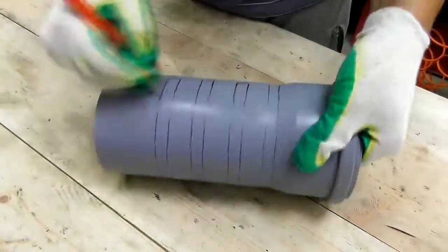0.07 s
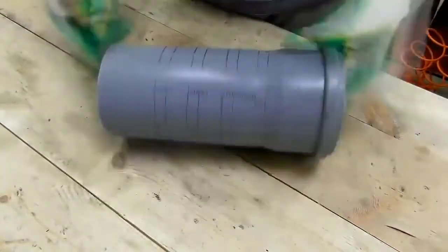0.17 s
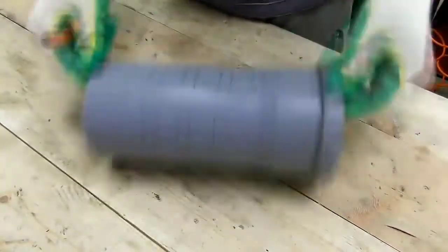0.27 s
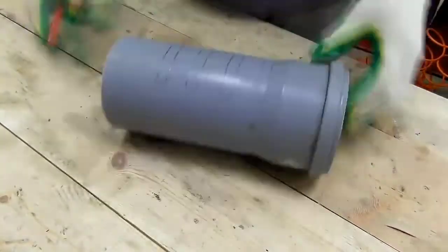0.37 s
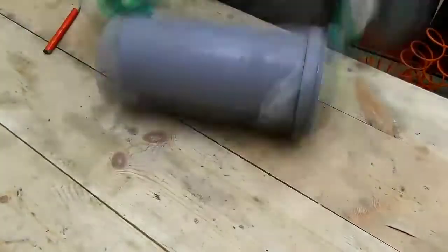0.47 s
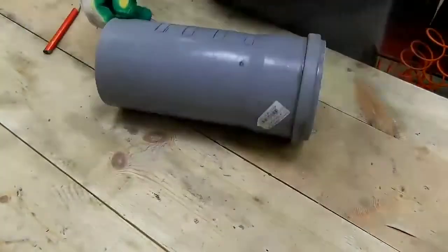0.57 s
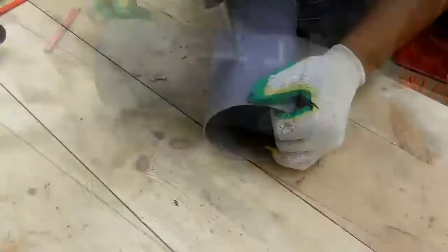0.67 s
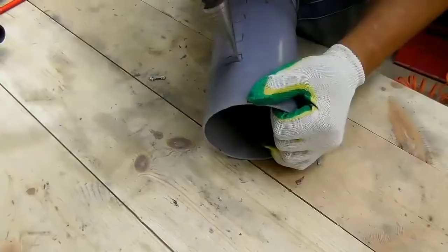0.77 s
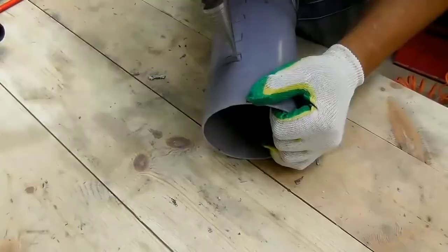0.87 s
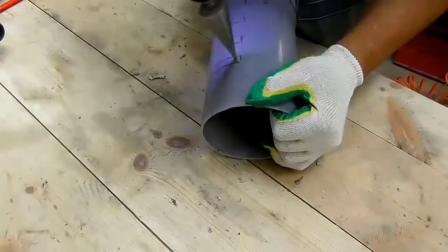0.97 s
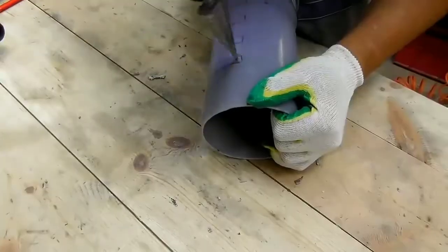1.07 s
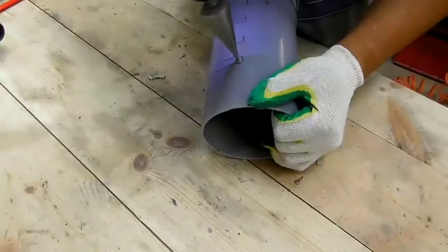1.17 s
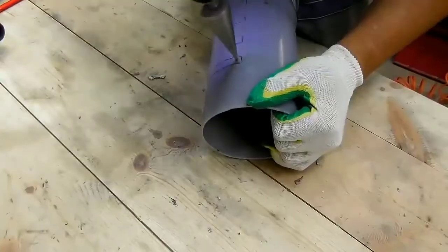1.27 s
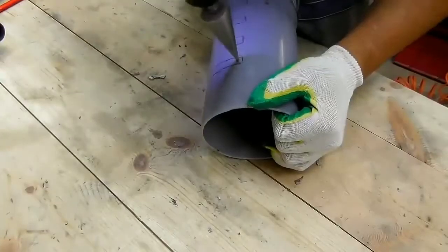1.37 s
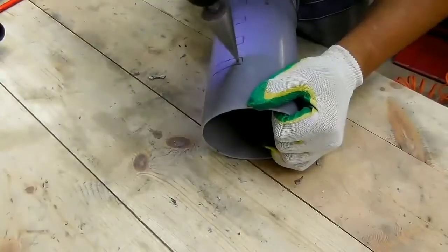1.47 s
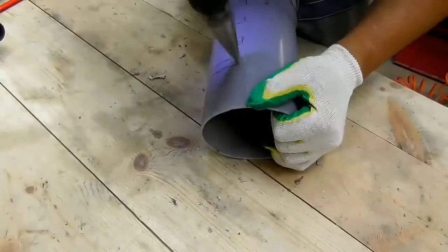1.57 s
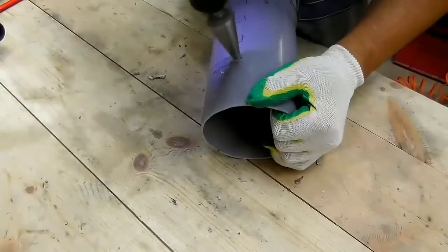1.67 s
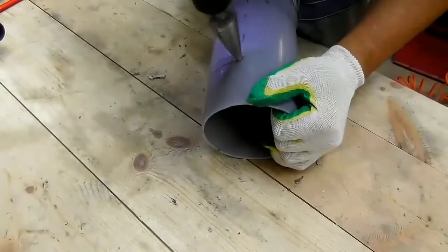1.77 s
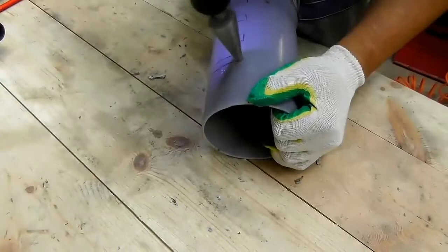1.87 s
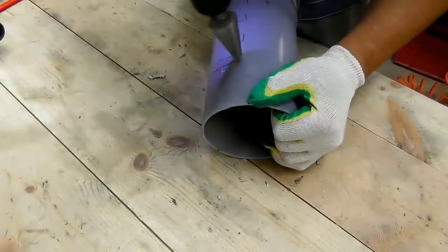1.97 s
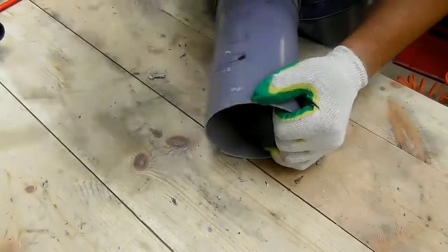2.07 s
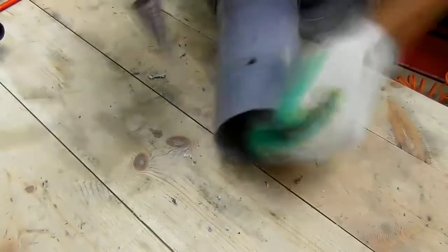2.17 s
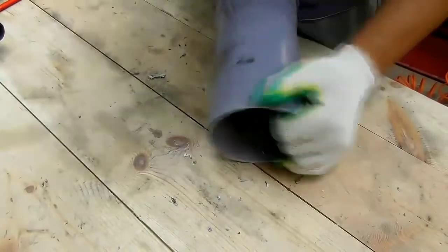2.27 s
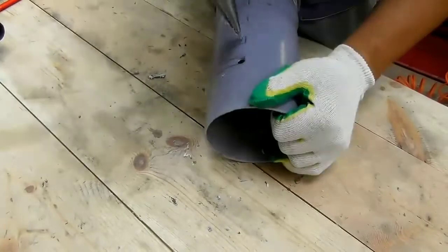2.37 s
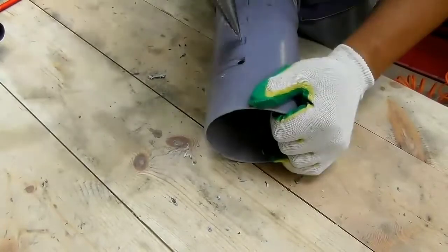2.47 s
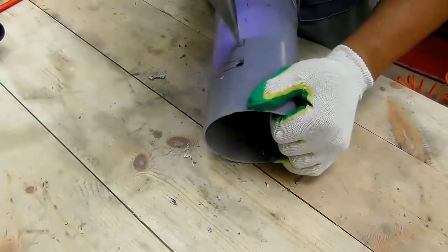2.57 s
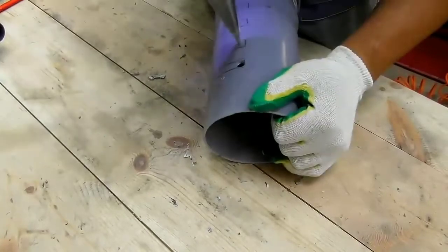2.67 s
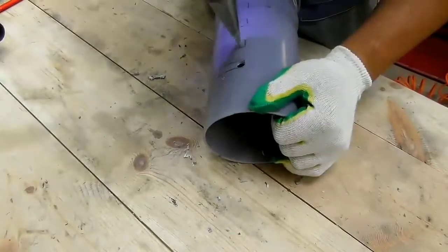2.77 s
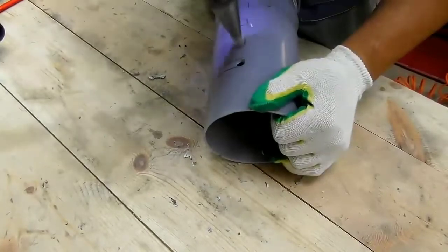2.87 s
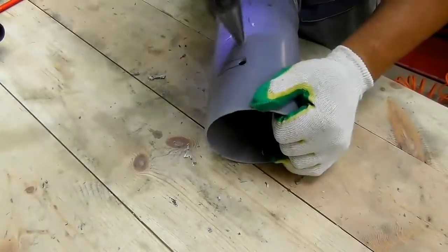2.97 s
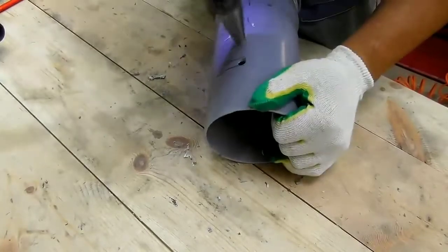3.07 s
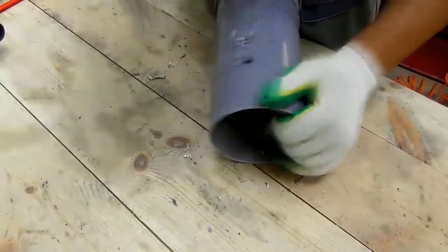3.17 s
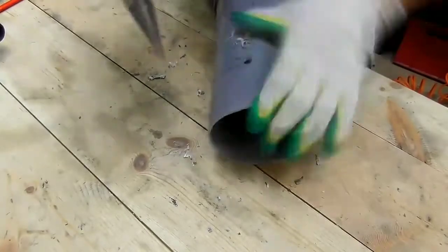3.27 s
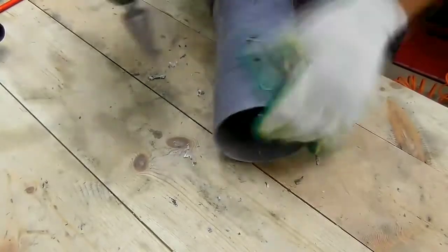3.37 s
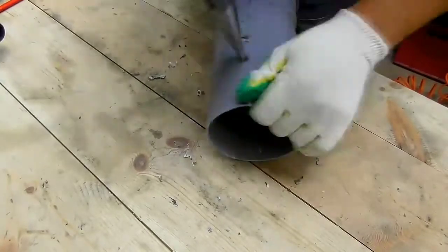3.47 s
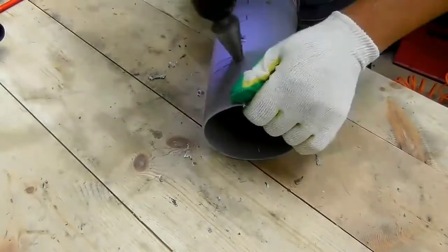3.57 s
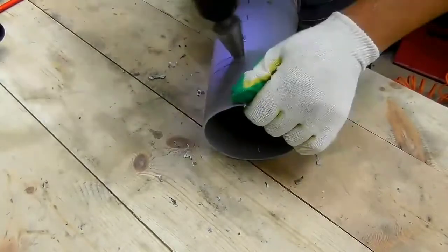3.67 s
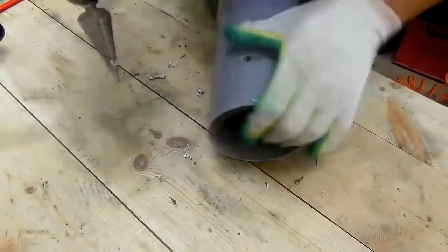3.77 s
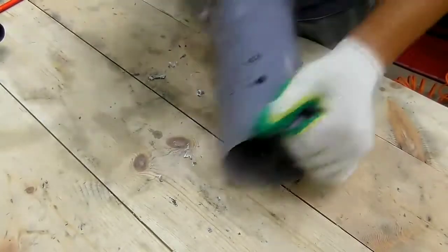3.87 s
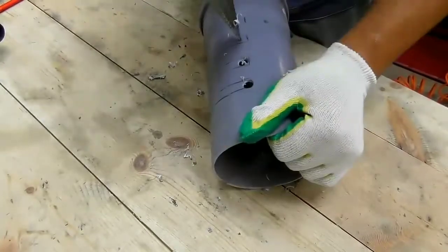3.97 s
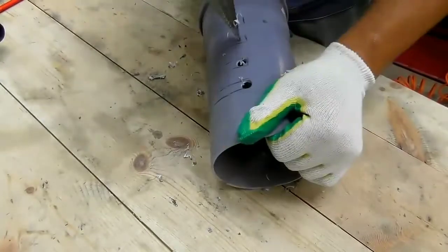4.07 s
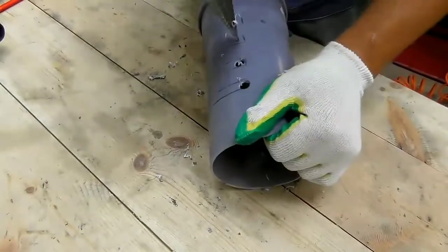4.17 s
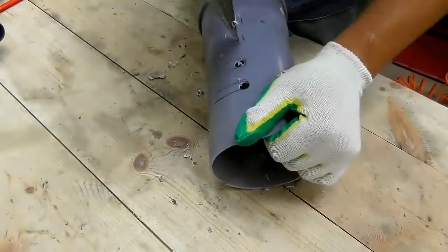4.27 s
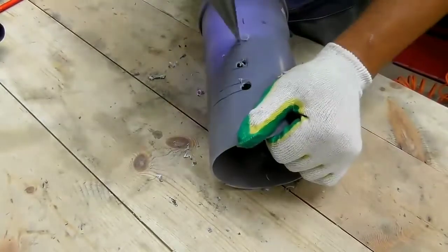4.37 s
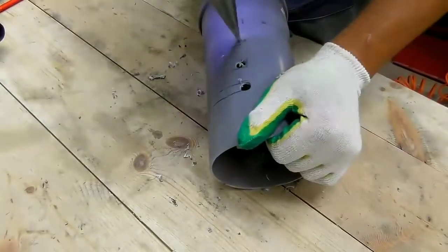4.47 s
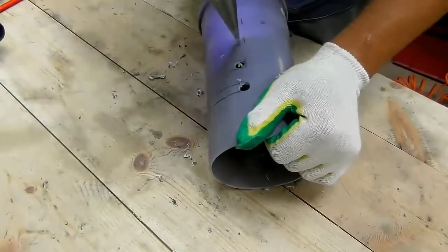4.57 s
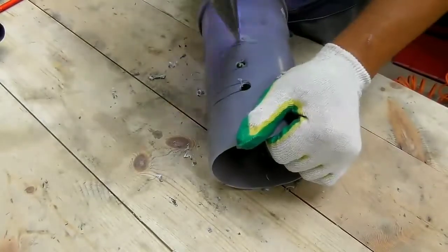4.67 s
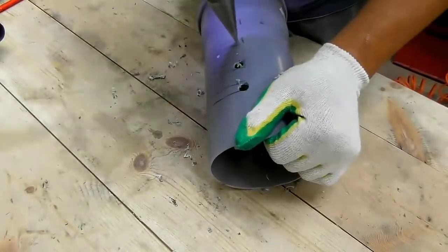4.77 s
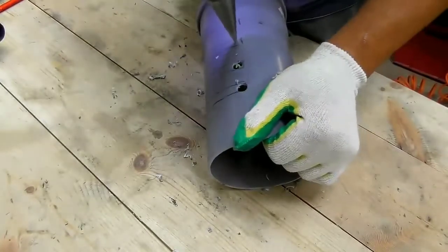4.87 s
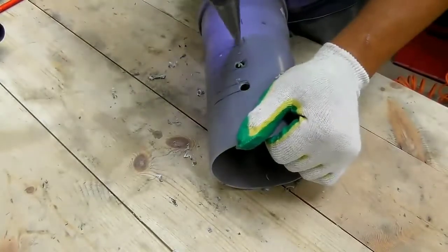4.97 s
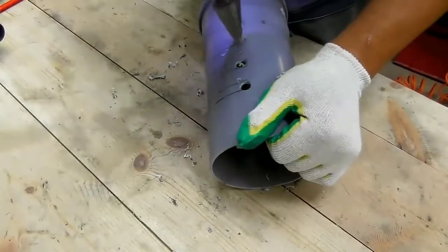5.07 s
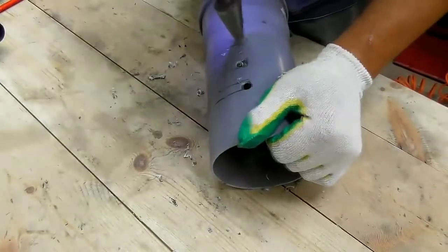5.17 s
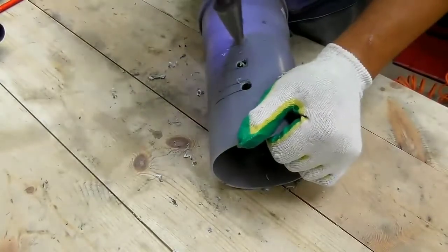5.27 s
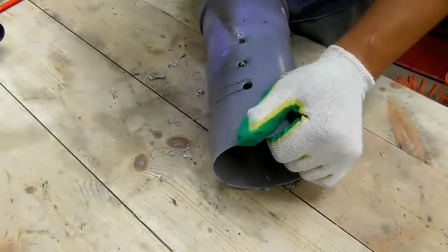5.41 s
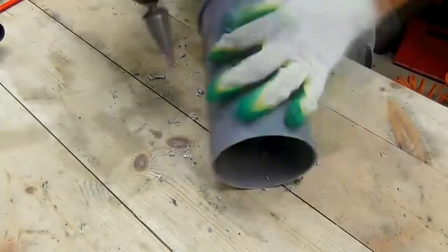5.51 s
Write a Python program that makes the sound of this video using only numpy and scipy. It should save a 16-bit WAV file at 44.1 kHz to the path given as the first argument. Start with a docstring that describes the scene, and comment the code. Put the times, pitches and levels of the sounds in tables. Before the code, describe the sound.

First light fabric rustles and sharp hollow clicks of a pipe being handled, then loud raspy drill pulls of uneven length, starting and stopping fast. The bit scrapes and squeals on plastic, the motor whines. A rustling, knocking pause comes before a short pull near the middle; longer bursts end the scene. Close phone microphone, dry quiet workshop with faint hum.

```python
"""On a wooden workshop bench, close to a phone microphone, a cordless drill bores a plastic drain pipe in short pulls.
Gear teeth rattle as grains of noise through the housing; shaped noise scrapes at the bit and hisses in the pipe wall.
Sines whine on multiples of the shaft speed, whistle at the speed switch and squeal at the bit.
Between holes gloves rustle on the pipe, short pushes tap its modes and soft tones bump on the bench;
a quiet room with mains hum lies behind."""
import sys
import numpy as np
from scipy import signal
from scipy.fft import rfft, irfft, next_fast_len
from scipy.io import wavfile
from scipy.ndimage import uniform_filter1d

SR = 44100
rng = np.random.default_rng(int(sys.argv[2]) if len(sys.argv) > 2 else 0)


def to_wav(s):
    """Save 16-bit WAV."""
    ch = np.atleast_2d(s).T  # columns
    pcm = np.round(np.clip(ch, -1, 1) * 32767)  # PCM
    wavfile.write(sys.argv[1], SR, pcm.astype(np.int16))


N = 244314
T = np.arange(N) / SR  # time, s
GRID = np.arange(0, N, 32) / SR  # coarser times for level curves, s
M = next_fast_len(N)  # spectrum length
F = np.arange(M // 2 + 1) * SR / M + 1e-3  # spectrum frequencies, Hz, kept above zero for the log


def undb(db):
    """Amplitude factor of a level in dB."""
    return 10 ** (np.asarray(db) / 20)


def unit(x, lo_hz=20., hi_hz=20000.):
    """Scale a sound so that its energy within a band has rms 1."""
    power = np.abs(rfft(x, M)[(F > lo_hz) & (F < hi_hz)]) ** 2
    return x * np.sqrt(N * M / (2 * np.sum(power)))


def colour(x, shape):
    """Filter by (pitch_hz, level_db) points joined on a log-frequency axis, near silence outside them."""
    hz, db = np.transpose(shape)
    gain_db = np.interp(np.log(F), np.log(hz), db, -120, -120)
    return irfft(rfft(x, M) * undb(gain_db), M)[:N]


def ring(x, modes):
    """Sum of (pitch_hz, width_hz, level_db) resonances driven by x."""
    return sum(undb(db) * signal.lfilter(*signal.iirpeak(hz, hz / width, SR), x)
               for hz, width, db in modes)


def walk(rate):
    """Random levels held 1 / rate s and smoothed twice; spread near 1."""
    k = int(SR / rate)
    steps = np.repeat(rng.standard_normal(N // k + 1), k)
    return 1.225 * uniform_filter1d(uniform_filter1d(steps, k), k)[:N]


def grit(spread_db, ring_db, patch_db=1.1):
    """Dense tiny impacts of uneven size; narrow modes ring up unevenly, alone and in groups of neighbours."""
    impacts = rng.standard_normal(N) * undb(spread_db * rng.exponential(size=N))
    z = signal.stft(impacts, nperseg=1024)[2]
    alone = uniform_filter1d(rng.standard_normal(z.shape), size=4, axis=1) * 2
    groups = uniform_filter1d(rng.standard_normal(z.shape), size=4, axis=1)
    groups = uniform_filter1d(groups, size=9, axis=0) * 6
    return signal.istft(z * undb(ring_db * alone + patch_db * groups), nperseg=1024)[1][:N]


def spin(hz, waver):
    """Phase of a slightly unsteady speed, in radians."""
    return 2 * np.pi * np.cumsum(hz * (1 + waver * walk(40))) / SR


def swell(s, hz, db, length):
    """A sine that swells and fades around s under a bell curve, length s wide at 1/e."""
    out = np.zeros(N)
    near = slice(max(int((s - 2 * length) * SR), 0), int((s + 2 * length) * SR))
    t = T[near] - s
    out[near] = undb(db) * np.exp(-(2 * t / length) ** 2) * np.sin(2 * np.pi * hz * t)
    return out


def soft_knee(db, knee_db):
    """Zero well below 0 dB, the level itself well above, rounded between."""
    return knee_db * np.logaddexp(0, db / knee_db)


def hold(rows, rise, fade, knee_db=1.9):
    """Rise, hold, fade in dB for (start_s, end_s, levels_db..) rows, slopes in dB/s; the loudest rules each column.
    The rounded edges keep short rows below their level."""
    rows = np.array(rows)
    before = soft_knee(rise * (rows[:, :1] - GRID), knee_db)
    after = soft_knee(fade * (GRID - rows[:, 1:2]), knee_db)
    return [np.interp(T, GRID, np.max(db[:, None] - before - after, axis=0)) for db in rows[:, 2:].T]


# room tone shape: pitch_hz, level_db (per Hz, relative)
ROOM_SHAPE = [(18, -39), (35, -22.5), (70, -23.5), (130, -20), (200, -18), (285, -33.5), (1980, -36),
              (5070, -42), (8340, -34), (12000, -38), (15600, -39)]
# mains hum: pitch_hz, level_db (peak, wandering)
MAINS_HUM = [(100, -58)]
# a faint tone still growing at the end: centre_s, pitch_hz, level_db (peak), length_s
FAINT_TONE = (7, 154, -61, 5.5)
ROOM_DB = -56


def shop():
    """Quiet room tone of gritty shaped noise, a sine of mains hum and a faint growing tone."""
    hum = sum(undb(db + 1.2 * walk(22)) * np.sin(2 * np.pi * hz * T) for hz, db in MAINS_HUM)
    return undb(ROOM_DB) * unit(colour(grit(.3, 2.2), ROOM_SHAPE)) + hum + swell(*FAINT_TONE)


# bumps of the pipe on the bench, low tones that swell and fade: centre_s, level_db (peak), pitch_hz, length_s
BENCH_BUMPS = [(0.338, -21.5, 409, 0.0055), (0.341, -44, 99, 0.03), (0.413, -45, 110, 0.017),
               (0.577, -41, 400, 0.035), (0.594, -39, 109, 0.018), (1.69, -27, 192, 0.014),
               (3.392, -37, 111, 0.048), (3.62, -27, 580, 0.0057), (3.645, -22, 196, 0.018),
               (4.001, -31.5, 198, 0.014), (4.006, -24.5, 446, 0.017), (5.135, -29.5, 200, 0.017)]


def bumps():
    """The pipe bumps on the bench: short low tones that swell and fade."""
    return sum(swell(s, hz, db, length) for s, db, hz, length in BENCH_BUMPS)


# taps on the pipe: start_s, level_db (push before the gains below), contact_ms (push time constant)
PIPE_TAPS = [(0.303, -31, 0.016), (.309, -22, 0.014), (.331, -16.5, 0.32), (0.345, -34, 0.26),
             (.4715, -24.5, 0.062), (.477, -28, 0.048), (0.4839, -13.5, 0.044), (0.489, -13, 0.041),
             (0.4919, -21, 0.04), (.498, -24, 0.051), (0.752, -44, .04), (0.764, -22, 0.022),
             (0.7694, -14.5, 0.018), (0.78, -31, 0.033), (1.086, -23, 0.017), (1.089, -25, 0.018),
             (2.309, -30, 0.017), (3.4142, -29, 0.035), (3.616, -22, 0.059), (3.639, -32, .05),
             (4.001, -11.5, 0.13), (4.003, -14, .4), (4.0715, -30.5, 0.12), (4.442, -31.5, 0.028)]
# resonances of the pipe: pitch_hz, width_hz, level_db (relative)
PIPE_RESONANCES = [(449, 38, -4.5), (690, 76, -6), (1123, 120, -5), (2150, 91, -5.5), (2790, 180, -1),
                   (4000, 160, 2.5), (4400, 110, 9.5), (6030, 360, 2), (7130, 110, 13.5), (8300, 220, 10),
                   (9400, 350, 6), (11200, 1000, -8)]
MODES_GAIN_DB, DIRECT_GAIN_DB = 16.5, 6


def knocks():
    """Each tap is a short push with chattering rebounds, heard directly and through the pipe's modes.
    A hard tip with brief contact excites the high modes, a soft blow the low ones."""
    push = np.zeros(N)
    chatter = rng.standard_normal((len(PIPE_TAPS), 256)) * np.exp(-np.arange(256) / 70.)
    for (s, db, ms), rebounds in zip(PIPE_TAPS, chatter):
        t = np.arange(64) / (ms * SR / 1000)
        contact = np.convolve(t * np.exp(-t), rebounds)
        contact /= np.sqrt(np.sum(contact ** 2))
        i = int(s * SR)
        push[i:i + len(contact)] += undb(db) * contact
    return undb(MODES_GAIN_DB) * ring(push, PIPE_RESONANCES) + undb(DIRECT_GAIN_DB) * push


# rumble of the wooden bench: pitch_hz, level_db (per Hz, relative)
BENCH_SHAPE = [(20, -40.5), (40, -7), (70, -1.5), (110, 0), (150, -1), (200, -28.5)]


def bench_rumble():
    """Low noise of the shaken bench, at rms 1."""
    return unit(colour(rng.standard_normal(N), BENCH_SHAPE))


# glove strokes on the pipe: start_s, end_s, rustle_db, pipe_body_db and bench_db (both re rustle)
GLOVE_STROKES = [(0.02, 0.063, -39, -9, -13), (0.097, .117, -42, -7, -20), (0.163, 0.21, -41, -7.5, -12),
                 (0.202, 0.226, -44.5, -0.5, -5), (0.258, 0.279, -39.5, -7.5, -19),
                 (.283, .298, -45, -12, -6), (0.309, 0.311, -32, -28, -25), (0.317, 0.324, -38, -8, -10),
                 (0.331, 0.35, -46.5, 7, 12), (0.345, 0.367, -40.5, -3.5, -5), (0.402, 0.427, -43, 0, 7.5),
                 (0.488, 0.48, -27.5, -4, -25), (.525, .545, -56, -4, 5), (0.553, 0.593, -39.5, -3, -8),
                 (0.593, 0.612, -52, 1, 12.5), (.625, .65, -59, -8, 0), (0.655, 0.74, -53, -6.5, -10),
                 (.749, .754, -42.5, -9, -20), (0.765, .767, -32, -11.5, -34),
                 (1.22, 1.245, -46.5, -11, -18), (1.748, 1.772, -44, -12, -19),
                 (2.24, 2.265, -45, -12, -20), (2.27, 2.294, -35.5, -11, -10),
                 (2.306, 2.328, -31, -11.5, -17), (2.34, 2.382, -37.5, -6, -8),
                 (2.385, 2.408, -42.5, -7, -16), (3.07, 3.092, -43, -9, -17),
                 (3.35, 3.375, -38.5, -11, -25), (3.385, 3.4, -39, 3.5, -2),
                 (3.417, 3.429, -21.5, -12.5, -19), (3.433, 3.49, -37.5, -7, -8),
                 (3.497, 3.505, -27.5, -14, -20), (3.54, 3.576, -44.5, -7.5, -10),
                 (3.593, 3.625, -46.5, 3.5, -18), (3.637, 3.652, -38.5, 7, -10),
                 (3.88, 3.904, -39, -12, -20), (3.913, 3.928, -30.5, -13.5, -31),
                 (3.937, 4.002, -38.5, -8, -11), (4.001, 4.008, -37.5, 9.5, -4),
                 (4.025, 4.047, -56, -1, 13.5)]
# rustle of the gloves: pitch_hz, level_db (per Hz, relative)
GLOVE_SHAPE = [(940, -43), (1600, -20.5), (2050, -4), (2300, -4), (2970, -4.5), (3400, -1.5), (4070, -3),
               (5270, -10), (6880, 0), (7790, -0.5), (10300, -9.5), (13400, -16.5), (15600, -20)]
# rubbed pipe body: pitch_hz, level_db (per Hz, relative)
PIPE_BODY_SHAPE = [(82, -32.5), (140, -11.5), (259, -8.5), (446, -8.5), (511, -14.5), (692, -9.5),
                   (1070, -11.5), (1550, -21.5), (1700, -25.5), (2210, -13.5), (3740, -120)]
RUB_RISE_DB_S, RUB_FADE_DB_S = 1102, 750.5


def gloves():
    """Knitted fibres rustle on the plastic, the pipe body sounds along and the bench rumbles."""
    strokes = [(a, b, db, db + body_db, db + bench_db) for a, b, db, body_db, bench_db in GLOVE_STROKES]
    rustle, body, bench = undb(hold(strokes, RUB_RISE_DB_S, RUB_FADE_DB_S))
    fibres = unit(colour(grit(1.5, 3.6), GLOVE_SHAPE), 1800, 12000) * undb(1.4 * walk(70))
    pipe_body = unit(colour(grit(1.1, 3.4), PIPE_BODY_SHAPE), 207.6, 1524)
    return rustle * fibres + body * pipe_body + bench * bench_rumble()


# trigger pulls: squeeze_s, up_to_speed_s, let_go_s, brake_db_s (dB/s), then in dB re the full gear rattle:
# scrape_first_db, scrape_last_db, wall_first_db, wall_last_db, pipe_air_db, bench_db
TRIGGER_PULLS = [(1.077, 1.109, 1.196, 1450, -14.5, -19, -6.5, -9.5, -37, -42),
                 (1.238, 1.268, 1.724, 1200, -19, -17.5, -8.5, -8, -37, -40),
                 (1.766, 1.794, 1.823, 1002, -14.5, -15, -7, -10, -32, -55),
                 (1.884, 1.912, 2.199, 1002, -17.5, -13.5, -8.5, -9, -32, -37),
                 (2.624, 2.66, 2.944, 900, -17, -16.5, -9, -6.5, -36.5, -44.5),
                 (2.968, 2.999, 3.043, 1150, -14, -14.5, -4.5, -6, -35, -43),
                 (3.085, 3.113, 3.327, 1300, -13, -17.5, -6.5, -9, -30.5, -39),
                 (3.648, 3.676, 3.847, 1300, -15, -12.5, -5.5, -3.5, -22, -30),
                 (4.432, 4.47, 4.773, 1100, -18, -20, -8.5, -8.5, -33.5, -47),
                 (4.811, 4.852, 5.173, 697, -19, -18, -8.5, -8.5, -31.5, -43),
                 (5.195, 5.217, 5.25, 700, -14, -15, -2, -5.5, -28, -34),
                 (5.284, 5.315, 5.46, 500, -14.5, -13, -4.5, -4.5, -24, -37),
                 (5.472, 5.549, 5.56, 1000, -19.5, -17, -6, -5, -43, -33)]
SPIN_UP_POWER = 2.07  # amplitude grows as this power of the time since the squeeze
BRAKE_KNEE_DB = 2.5
COAST_DB, COAST_DB_S = -25.5, 350  # the chuck coasts out more slowly: level at let-go, fall in dB/s


def trigger():
    """Level in dB below full speed: spin-up, run, brake, then coasting."""
    squeeze, full, go, brake = np.array(TRIGGER_PULLS)[:, :4].T[:, :, None]
    up = 20 * SPIN_UP_POWER * np.log10(np.clip((GRID - squeeze) / (full - squeeze), 1e-3, 1))
    braking = -soft_knee(brake * (GRID - go), BRAKE_KNEE_DB)
    coasting = COAST_DB - COAST_DB_S * (GRID - go)
    down = np.minimum(np.maximum(braking, coasting), 0)
    return np.interp(T, GRID, np.max(up + down, axis=0))


# squeals of the bit on plastic: centre_s, pitch_hz, level_db (rms at the crest, before flicker), length_s
BIT_SQUEALS = [(1.464, 397, -41, 0.073), (1.553, 5900, -27, 0.066), (2.042, 450, -33, 0.036),
               (2.015, 1700, -36, .04), (2.15, 4750, -30, .05), (2.822, 7240, -22, .1),
               (3.216, 4360, -26.5, .05), (4.94, 515, -43, 0.047), (4.664, 2200, -37.5, 0.22),
               (4.897, 7400, -19, 0.071), (5.357, 2266, -29.5, 0.055), (5.47, 5180, -31, 0.048)]


def squeals():
    """The bit squeals briefly on the plastic: sines that swell and fade."""
    return sum(swell(*squeal) for squeal in BIT_SQUEALS)


# whistle of the speed switch: start_s, end_s, pitch_hz, level_db (rms, before flicker)
SWITCH_WHISTLES = [(4.485, 4.538, 5003, -29), (4.66, 4.744, 4994, -26), (4.865, 4.92, 4994, -33),
                   (4.935, 5.014, 4984, -28.5), (5.03, 5.15, 4976, -35)]
SWITCH_RISE_DB_S, SWITCH_FADE_DB_S = 699, 400


def switch_whistle():
    """The speed switch whistles on one thin, nearly steady sine."""
    start, end, hz, db = np.transpose(SWITCH_WHISTLES)
    whistle_db = hold(np.transpose([start, end, db]), SWITCH_RISE_DB_S, SWITCH_FADE_DB_S)[0]
    return undb(whistle_db) * np.sin(spin(np.interp(T, (start + end) / 2, hz), .0003))


# where the motor tones come forward: start_s, end_s, shaft_db, poles_db (rms at full speed, before flicker)
WHINE_SPELLS = [(1.175, 1.185, -66, -31.5), (1.505, 1.56, -39, -52), (1.585, 1.65, -37, -24),
                (1.995, 2.045, -53, -31.5), (2.88, 2.905, -45, -32), (3.175, 3.185, -33, -33),
                (3.22, 3.26, -34, -43), (3.27, 3.305, -50, -32.5), (4.555, 4.59, -35, -52.5),
                (4.6, 4.72, -50, -47), (4.735, 4.76, -41, -53), (4.975, 5.04, -35, -40),
                (5.055, 5.065, -34, -25.5), (5.07, 5.115, -35.5, -38)]
# shaft speed, before a slight waver: time_s, pitch_hz
SHAFT_SPEED = [(1.14, 416), (1.19, 423), (1.47, 659), (1.582, 770), (1.64, 769), (1.67, 755), (1.7, 700),
               (1.97, 545), (2.035, 557), (2.82, 517), (2.86, 508), (2.94, 470), (3.15, 460), (3.26, 420),
               (3.29, 418), (3.34, 400), (4.53, 715), (4.62, 700), (4.74, 712), (4.94, 690), (4.98, 714),
               (5.06, 729), (5.1, 721), (5.14, 690)]
# pole tones: multiple_of_shaft, level_db (re poles_db)
POLE_ORDERS = [(3.1, -15.5), (4, 1.5), (8, -1.5)]
# gear tone: multiple_of_shaft, level_db (re the mean of the shaft and pole levels in dB)
GEAR_TONE = (1.548, -1.1)
WHINE_EDGE_DB_S = 450


def whine():
    """The motor whines on sines at the shaft speed, its pole multiples and a gear multiple."""
    shaft_db, pole_db = hold(WHINE_SPELLS, WHINE_EDGE_DB_S, WHINE_EDGE_DB_S) + trigger()
    turn = spin(np.interp(T, *np.transpose(SHAFT_SPEED)), .002)
    poles = sum(undb(db) * np.sin(k * turn) for k, db in POLE_ORDERS)
    gear_multiple, gear_db = GEAR_TONE
    gear = undb(gear_db + (shaft_db + pole_db) / 2) * np.sin(gear_multiple * turn)
    return undb(shaft_db) * np.sin(turn) + undb(pole_db) * poles + gear


def tones():
    """Motor whine, switch whistle and bit squeals flicker together in level."""
    sines = squeals() + whine() + switch_whistle()
    return np.sqrt(2) * sines * undb(1.2 * walk(50))  # root 2 turns peak levels into rms


# gear rattle while the motor runs, before the trigger's falls: time_s, level_db
RATTLE_LEVEL = [(1.105, -20.5), (1.13, -15.5), (1.192, -17), (1.267, -14), (1.311, -14), (1.411, -20),
                (1.487, -11.5), (1.609, -16), (1.691, -13.5), (1.721, -18.5), (1.8, -15.5), (1.908, -16.5),
                (1.96, -14.5), (2.066, -15), (2.148, -16.5), (2.175, -19.5), (2.2, -24.5), (2.66, -14.5),
                (2.758, -17.5), (2.872, -13), (2.942, -19.5), (3.0, -16), (3.11, -15), (3.28, -19),
                (3.326, -17.5), (3.676, -19), (3.72, -15.5), (3.764, -19.5), (3.818, -19), (3.856, -18.5),
                (4.47, -13.5), (4.627, -16.5), (4.743, -14), (4.878, -14), (4.938, -17), (5.098, -13.5),
                (5.165, -18), (5.246, -16.5), (5.313, -15), (5.393, -19.5), (5.439, -14), (5.469, -19.5),
                (5.54, -19)]
# sound through the housing: pitch_hz, level_db (per Hz, relative)
HOUSING_SHAPE = [(2880, -39.5), (4900, -29.5), (5240, -8.5), (5890, 3.5), (6750, -7), (7090, 1.5),
                 (7510, 3.5), (10000, -3.5), (11300, -15), (14700, -24.5), (15600, -38)]
# resonances of the housing: pitch_hz, width_hz, level_db (relative)
HOUSING_RESONANCES = [(5600, 40, 0), (7150, 1700, 4.5), (9150, 290, -5), (10130, 220, -9.5)]


def gear_rattle(rattle_db):
    """Gear teeth strike as dense uneven grains, coloured and rung by the housing."""
    teeth = grit(0.9, 3.1)
    housing = unit(colour(teeth, HOUSING_SHAPE)) + undb(-3.5) * unit(ring(teeth, HOUSING_RESONANCES))
    return undb(rattle_db) * unit(housing, 5300, 8670) * undb(0.47 * walk(60))


# bit scraping: pitch_hz, level_db (per Hz, relative)
SCRAPE_SHAPE = [(180, -46), (300, -16.5), (368, -3), (452, 1), (577, -3), (702, 1), (797, -3.5), (870, 0.5),
                (1500, -4.5), (1690, 1.5), (2250, -0.5), (2760, -7.5), (3100, -8.5), (4030, -36),
                (6820, -120)]
# hiss of the pipe wall: pitch_hz, level_db (per Hz, relative)
WALL_SHAPE = [(1710, -41.5), (2900, -11.5), (3330, -6.5), (3420, -3), (4090, 1.5), (4560, -3),
              (5200, -11.5), (6760, -39), (11400, -120)]
# air column of the pipe, passed twice: pitch_hz, width_hz (each pass), level_db
AIR_COLUMN = [(208.3, 56.5, 0)]
# dB lost per dB of rattle below full: scrape, wall, pipe_air, bench
RATTLE_SHARES = (0.61, 0.69, 0.52, 0.67)
# the bit snags and shakes the pipe on the bench: centre_s, length_s, pipe_air_db, bench_db
BIT_SNAGS = [(1.673, 0.015, -42, -46), (1.975, .04, -41.5, -43), (2.05, 0.038, -51, -44),
             (2.9, 0.021, -43.5, -45.5), (3.037, .02, -42, -57), (3.125, 0.018, -36.5, -57),
             (3.26, 0.043, -44.5, -41.5), (3.72, .02, -35.5, -54.5), (3.764, .03, -31, -45.5),
             (4.568, .03, -41.5, -72), (4.72, 0.044, -41, -56), (5.14, 0.017, -36, -40),
             (5.335, .04, -38, -49), (5.47, 0.026, -38.5, -47)]
FULL_DB = -15  # full gear rattle
STILL_DB = -52.5  # rattle level under which the cutting dies away faster
SNAG_EDGE_DB_S = 303


def cutting(rattle_db):
    """The bit scrapes and the wall hisses as flickering grains; noise sounds the pipe air and bench, more at snags."""
    pulls = np.array(TRIGGER_PULLS)
    run_times = pulls[:, 1:3].ravel()  # up to speed and let go of each pull
    running = undb(np.minimum(rattle_db - STILL_DB, 0))
    columns = [[4, 5], [6, 7], [8, 8], [9, 9]]  # first and last level of each layer
    levels = []
    for ends, share in zip(columns, RATTLE_SHARES):
        layer_db = FULL_DB + np.interp(T, run_times, pulls[:, ends].ravel())
        levels.append(running * undb(layer_db + share * (rattle_db - FULL_DB)))
    scrape, wall, air, bench = levels
    snags = [(s - w / 2, s + w / 2, air_db, bench_db) for s, w, air_db, bench_db in BIT_SNAGS]
    snag_air, snag_bench = undb(hold(snags, SNAG_EDGE_DB_S, SNAG_EDGE_DB_S))
    scraping = unit(colour(grit(1., 3.8), SCRAPE_SHAPE), 330, 1500) * undb(0.81 * walk(30))
    hiss = unit(colour(grit(1.2, 3.7), WALL_SHAPE), 3300, 4800) * undb(.9 * walk(40))
    pipe_air = unit(ring(ring(rng.standard_normal(N), AIR_COLUMN), AIR_COLUMN))
    return (scrape * scraping + wall * hiss
            + np.hypot(air, snag_air) * pipe_air + np.hypot(bench, snag_bench) * bench_rumble())


def drill():
    """Gear rattle under the trigger, with the cutting that follows its level."""
    rattle_db = np.interp(T, *np.transpose(RATTLE_LEVEL)) + trigger()
    return gear_rattle(rattle_db) + cutting(rattle_db)


def scene():
    """Room, bumps, taps, gloves, tones and drill summed to one channel."""
    return (shop() + bumps() + knocks() + gloves() + tones() + drill())[None]


TOP_HZ = 15780


def record(dry):
    """The phone rounds the loudest peaks and cuts steeply above its top frequency."""
    rounded = np.tanh(1.03 * dry) / 1.169
    return signal.sosfilt(signal.ellip(14, .2, 80, TOP_HZ, fs=SR, output="sos"), rounded)


dry = scene()
out = record(dry)
to_wav(out)
```